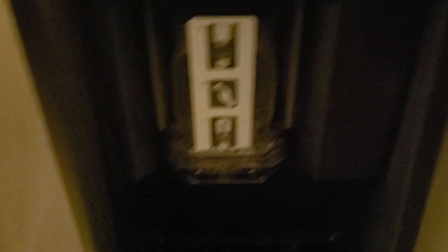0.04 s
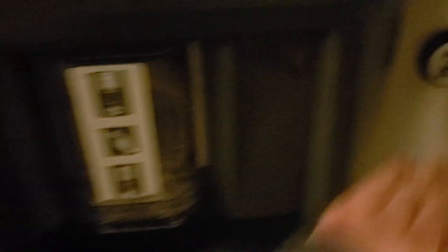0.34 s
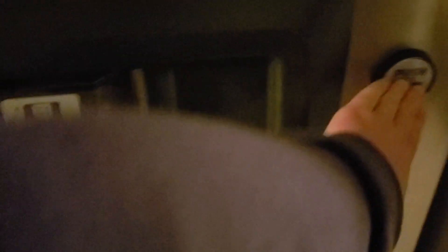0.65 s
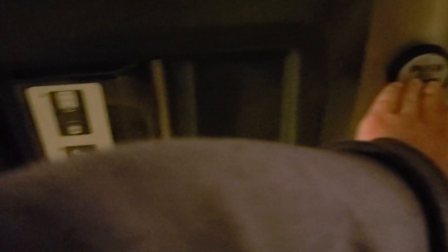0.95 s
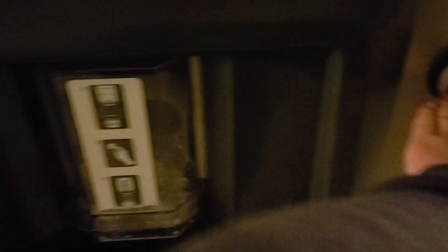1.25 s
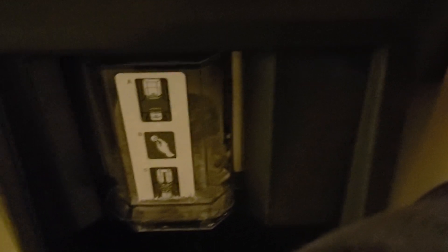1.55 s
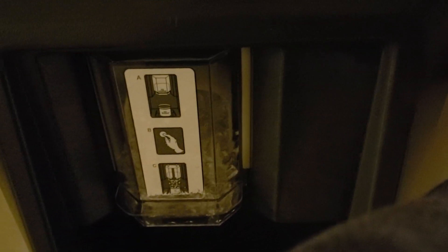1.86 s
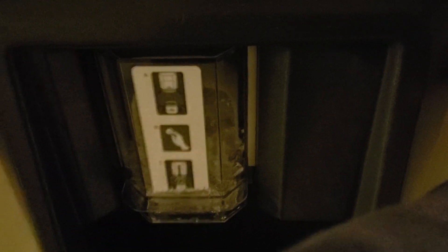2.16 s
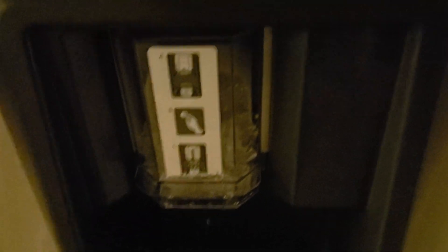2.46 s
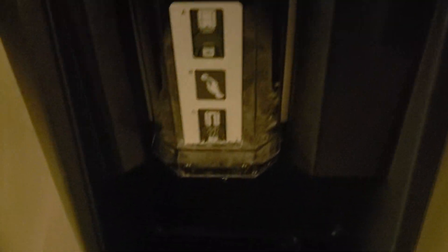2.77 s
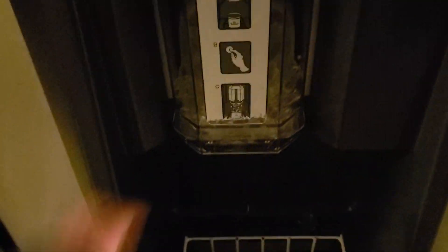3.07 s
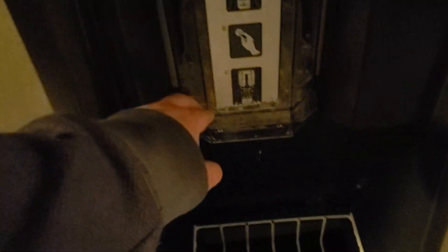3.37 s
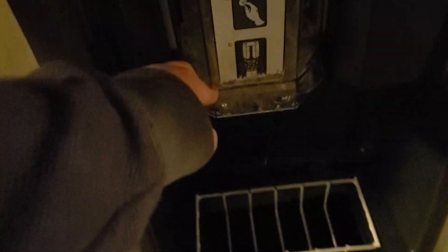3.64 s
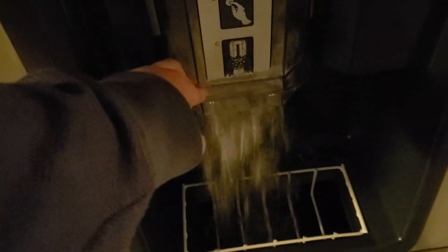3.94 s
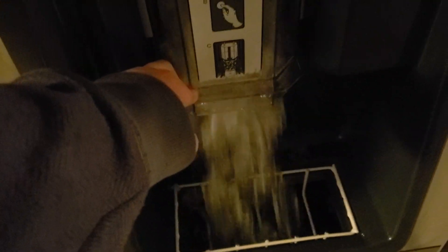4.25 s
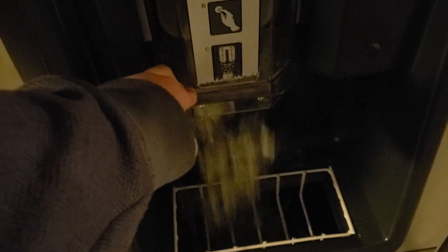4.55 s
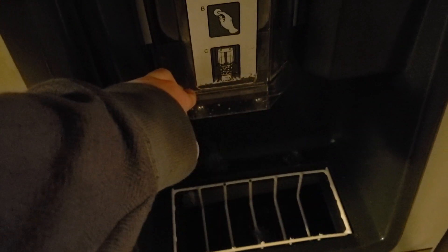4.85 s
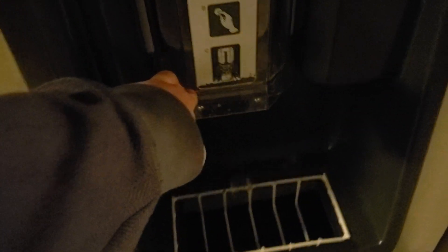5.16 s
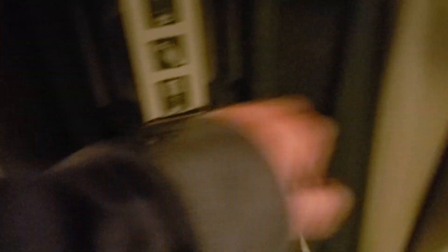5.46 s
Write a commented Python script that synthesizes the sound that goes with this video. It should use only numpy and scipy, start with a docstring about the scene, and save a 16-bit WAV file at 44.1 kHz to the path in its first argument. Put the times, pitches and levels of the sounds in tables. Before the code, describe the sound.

Close to an ice machine, a compressor hums and a fan blows. A button clicks and a geared motor rumbles, sending muffled ice rattling into a closed plastic chute. After a pause the chute clicks open and ice rushes out loudly, clattering on a wire grate and drumming on a plastic tray. The last pieces drop, the chute clacks shut, and the hum carries on more quietly.

```python
"""At the dispenser alcove of an ice machine, a compressor hums and a fan blows as the microphone comes
close. A button clicks and a geared auger rumbles ice into the closed chute. The chute is pushed open:
ice rushes out, clatters on a wire grate and drums on the plastic drain tray, the last pieces drop,
and the chute clacks shut. The alcove gives the contacts a short tail. The loud pour ducks the
microphone's gain, and the hum stays low afterwards."""
import sys
import numpy as np
from scipy import signal
from scipy.fft import rfft, irfft, next_fast_len
from scipy.io import wavfile
from scipy.ndimage import uniform_filter1d, map_coordinates

SR = 44100
rng = np.random.default_rng(int(sys.argv[2]) if len(sys.argv) > 2 else 0)


def dump(signal):
    """Clip the signal to [-1, 1] and save it as 16-bit WAV at the path in sys.argv[1]."""
    limited = np.clip(np.atleast_2d(signal).T, -1, 1)
    pcm = np.round(limited * 32767).astype(np.int16)
    wavfile.write(sys.argv[1], SR, pcm)


N = 251811
TIME = np.arange(N) / SR
RING = np.arange(SR // 4) / SR  # time axis of one hit, in seconds

# The biggest lumps landing. Each row: start in seconds, level in dB, own pitch in Hz,
# bright edge in dB relative to that level.
LUMP_HITS = [(3.737, -12, 1920, -8), (3.7915, -7.5, 1590, 12.5), (3.8248, -11.5, 1470, 10),
             (3.9388, -0.5, 1490, -4), (3.9821, -7, 1580, 10), (4.025, -1, 2790, 12),
             (4.0964, 0, 1520, 13.5), (4.2559, -2.5, 1550, 2), (4.3095, -1, 2790, 8), (4.3544, -2, 1920, 3),
             (4.3663, 2.5, 2920, 5), (4.481, -.5, 1640, 10), (4.5943, -1.5, 2900, 9), (4.6154, 1, 2740, 9),
             (4.624, -1, 1605, -6), (4.8474, 0, 1820, 2), (4.8582, -4, 1520, 12), (4.9155, -0.5, 2790, 4.5),
             (4.924, 1, 2790, -2), (5.0569, -16.5, 1660, 8)]
# The ring of the wire grate and its frame. Each row: pitch in Hz, width in Hz, gain in dB.
GRATE_MODES = [(1247, 68, -7.5), (1350, 30, 2.5), (1520, 48, 0.5), (1657, 45, 4), (1963, 15, -9),
               (2228, 32, -1), (2660, 23, -9.5), (2790, 20, 6), (2930, 20, 0), (3530, 174, -17),
               (4410, 200, -12)]
# The drum of the drain tray. Each row: pitch in Hz, width in Hz, gain in dB.
TRAY_MODES = [(85.5, 29, -8), (175, 34.5, -2.5), (432, 46, -0.5), (496, 53, -2), (593, 107, -3),
              (764, 110, -7)]
# The colour of ice striking plastic. Each row: frequency in Hz, relative level in dB.
ICE_EQ = [(100, -43), (400, -10.5), (950, -4.5), (1550, -1.5), (1950, -1.5), (2800, -4), (3900, -3),
          (4500, -6.5), (6000, -12), (9000, -23), (16000, -25)]
# The sparkle of small chips. Each row: frequency in Hz, relative level in dB.
CHIP_EQ = [(1000, -64), (4000, 2.5), (7000, -0.5), (10000, -2), (12500, 2.5), (16000, -10)]
# Ice muffled by the chute's walls. Each row: frequency in Hz, relative level in dB.
CLOSED_CHUTE_EQ = [(40, -31), (150, 9), (400, -12), (800, -9), (1100, 0), (1900, 0), (3200, -4),
                   (6000, -9.5), (9000, -15), (16000, -15)]
# Single nuggets on the chute's wall. Each row: start in seconds, level in dB, relative edge in dB.
NUGGET_HITS = [(1.0906, -23.5, 13.5), (1.1116, -20.5, 15.5), (1.217, -16.5, 6.5), (1.2705, -34.5, 26),
               (1.8513, -26.5, 1), (2.0997, -28.5, 11), (2.1673, -39.5, 17.5), (2.2568, -32, 12.5),
               (3.054, -46, 25.5), (5.1367, -24.5, 24)]
# The button, then the chute opening and shutting. Each row: start in seconds, level in dB,
# relative edge in dB.
CLICK_HITS = [(0.6805, -23, 3.5), (3.605, -23.5, 5.5), (5.3088, -8.5, 3.5), (5.3155, -10.5, 1),
              (5.4622, -22, -3), (5.4807, -16, -1)]
# The button's ring. Each row: pitch in Hz, level in dB relative to its click, t60 in seconds.
BUTTON_MODES = [(1140, -4, 0.043), (2690, -11, 0.028), (3130, -1.5, 0.033), (3660, -8, .03)]
# The snap of plastic. Each row: frequency in Hz, relative level in dB.
SNAP_EQ = [(300, -53), (1500, -7), (3200, -5), (6000, -6.5), (10000, -13.5), (16000, -19)]
# The ring in that snap. Each row: pitch in Hz, width in Hz, gain in dB.
SNAP_MODES = [(1070, 400, 10), (3100, 590, 24.7)]
# The hollow knock under it. Each row: frequency in Hz, relative level in dB.
KNOCK_EQ = [(60, -36), (330, 6), (900, 1), (1700, 1.5), (2500, -1.5), (5000, -10), (16000, -63)]
# The chute rubbing on its guide. Each row: frequency in Hz, relative level in dB.
SCUFF_EQ = [(200, -24), (900, -2), (1400, 0), (2300, -3), (3000, -12), (5000, -15), (16000, -40)]
# The rumble of the auger's gears. Each row: frequency in Hz, relative level in dB.
GEAR_EQ = [(25, -31), (55, -20), (85, 0.5), (110, -6), (170, -2), (330, -7), (700, -11.5), (830, -10.5),
           (1000, -19), (2000, -22), (6000, -39.5), (16000, -58)]
# The auger motor's whine. Each row: pitch in Hz, level in dB relative to the rumble.
WHINE_TONES = [(240, -6), (802, -12.5)]
# Dull thumps of the cabinet. Each row: start in seconds, relative level in dB.
CABINET_HITS = [(.88, -23), (3.594, -20.5), (4.02, -14.5), (4.916, -15), (5.321, -21.5), (5.363, -17)]
# The machine's weaker tones. Each row: pitch in Hz, level in dB relative to the main hum.
HUM_TONES = [(58.3, -21.5), (232, -12.5), (275, -15), (411, -17.5)]
# The fan's air. Each row: frequency in Hz, relative level in dB.
FAN_EQ = [(25, -45), (60, -20.5), (110, -0.5), (180, -5), (250, -1), (340, -4), (430, -3.5), (620, -8),
          (1000, -16), (2100, -21), (3300, -28.5), (6000, -38.5), (10000, -51.5), (16000, -53)]
# Stereo width. Each row: frequency in Hz, likeness of left and right from 0 to 1.
STEREO_LIKENESS = [(150, .99), (380, .95), (700, .72), (1300, .58), (2400, .25), (4400, 0)]
# The lean of a sound facing the right microphone port. Each row: frequency in Hz, left minus right in dB.
PAN_CURVE = [(60, 5), (95, -0.5), (150, 1), (240, 2), (380, 0), (600, 3), (950, -1), (1500, -2.5),
             (2380, -8), (3770, 2.5), (5980, -1), (9470, -6.5), (15000, -12)]

OPEN_S, OPENING_S, EMPTY_S = 3.594, 0.29, 4.736  # the chute is pushed, takes time to open, runs empty
FLOW_POWER, FLOW_SAG_DB_PER_S = 1.62, 4.5  # flow grows as a power of the opening, sags as it drains
SURGE_S, SURGE_DB = 3.925, 8  # the bulk of the load gives way
LUMP_RING_DB, LUMP_KNOCK_DB = -4, 27.5  # a lump's own ring and its send to the tray, relative to its level
LOAD_START_S, LOAD_END_S, LOAD_DB = 1.085, 1.48, -35.5
AUGER_ON_S, AUGER_OFF_S, AUGER_DB = 0.853, 2.36, -31.5
HUM_HZ, HUM_DB, FAN_DB = 136.7, -24.5, -30
APPROACH_DB, APPROACH_S = 4, 0.52  # hum and fan fade up as the microphone comes close


def ice_pour():
    """Ice clatters out, rings the grate and drums on the tray; fine chips crackle on a little longer."""
    surge = np.clip((TIME - SURGE_S) / 0.025, 0, 1)
    jump = amp(SURGE_DB * (surge - 1))
    flow = lambda fall: jump * swell(OPEN_S, OPENING_S, EMPTY_S, FLOW_SAG_DB_PER_S, fall, FLOW_POWER)
    clatter = amp(-12) * flow(fall=59.5)  # dB a second once the chute is empty
    crackle = amp(-16.8 + 1.8 * wobble(22)) * flow(fall=47.5)  # chips come in small clumps
    starts, db, pitches, edge_db = np.transpose(LUMP_HITS)
    landings = lambda: [contact(t60=.022, alcove_db=-9, alcove_t60=.1, attack=.0008) for _ in starts]
    clack = lambda: contact(t60=.007, alcove_db=-11, alcove_t60=.1)
    pieces = shower(impacts(clatter, rate=500, spread_db=2.5), clack)
    lumps = blows(starts, db, landings())
    body = coloured(amp(2) * pieces + amp(12.5) * lumps, ICE_EQ)
    grate = resonant(amp(16) * pieces + amp(24.5) * lumps, GRATE_MODES)
    knocks = blows(starts, db + LUMP_KNOCK_DB, landings())
    # small pieces are only heavy enough to drum on the tray once the bulk comes down
    tray = resonant(amp(18.5) * surge * pieces + knocks, TRAY_MODES)
    chips = impacts(crackle, rate=2000, spread_db=-0.5)
    crunch = shower(chips, lambda: contact(t60=0.0011, alcove_db=-2, alcove_t60=0.13), spots=5)
    chinks = tinkle(chips, low_hz=4000, high_hz=16000, t60=.016)
    edges = blows(starts, db + edge_db, landings())
    sparkle = coloured(amp(-0.9) * crunch + amp(-0.5) * chinks + edges, CHIP_EQ)
    tocks = blows(starts, db + LUMP_RING_DB, [mode(hz, t60=.03, attack=.002) for hz in pitches])
    return stereo(body + grate + tray + sparkle) + tocks


def chute_filling():
    """A load rattles into the empty chute; a trickle lands ever more softly on the growing pile."""
    load = amp(LOAD_DB) * swell(LOAD_START_S, .008, LOAD_END_S, sag_db_per_s=0.5, fall_db_per_s=48)
    spurts = amp(-48 + 0.95 * wobble(22))
    trickle = spurts * swell(AUGER_ON_S, 0.15, AUGER_OFF_S, sag_db_per_s=6, fall_db_per_s=17)
    pieces = impacts(np.hypot(load, trickle), rate=1100, spread_db=4)
    clacks = shower(pieces, lambda: contact(t60=0.0036, alcove_db=-14, alcove_t60=0.09), spots=5)
    chinks = tinkle(pieces, low_hz=3280, high_hz=16000, t60=.017)
    return stereo(coloured(amp(7) * clacks + amp(5) * chinks, CLOSED_CHUTE_EQ))


def plastic_clicks():
    """Button and chute click, the button rings, and nuggets tick on the wall with a brighter edge."""
    pressed_s, pressed_db, _ = CLICK_HITS[0]
    ring = sum(amp(db) * mode(hz, t60, attack=.001) for hz, db, t60 in BUTTON_MODES)
    button = blows([pressed_s], [pressed_db], [ring])
    return taps(CLICK_HITS, knock_db=16.5) + button + taps(NUGGET_HITS, knock_db=17)


def chute_scuff():
    """The hollow chute rubs along its guide just before it shuts."""
    rubbing = amp(-27.5) * swell(start=5.243, attack=0.02, end=5.32, sag_db_per_s=-3, fall_db_per_s=245)
    catches = amp(2 * wobble(220))
    return rubbing * catches * stereo(noise(SCUFF_EQ))


def auger():
    """The geared motor rumbles and whines while it pushes ice forward."""
    running = amp(AUGER_DB) * swell(AUGER_ON_S, 0.014, AUGER_OFF_S, sag_db_per_s=-1.9, fall_db_per_s=250)
    whine = sum(amp(db + 4.5 * wobble(12.07)) * np.sin(2 * np.pi * hz * TIME + 1.84 * wobble(16))
                for hz, db in WHINE_TONES)
    rumble = amp(1.8 * wobble(10)) * stereo(noise(GEAR_EQ))
    return running * (rumble + whine)


def cabinet_boom():
    """Shoves on the chute and the weight of the ice set a large panel booming."""
    starts, db = np.transpose(CABINET_HITS)
    return blows(starts, db - 1.5, [mode(hz=90.5, t60=0.17, attack=0.0051)] * len(starts))


def compressor_and_fan():
    """The bed: the compressor's slightly wavering hum and the fan's rush."""
    approach = amp(-APPROACH_DB * np.maximum(1 - TIME / APPROACH_S, 0))
    tone = lambda hz, drift: np.sqrt(2) * np.sin(2 * np.pi * hz * TIME + drift * wobble(9))
    hum = tone(HUM_HZ, drift=0.074) * amp(-0.13 + 1.18 * wobble(14))
    side_tones = sum(amp(db + 1.4 * wobble(9.2)) * tone(hz, drift=hz / 300) for hz, db in HUM_TONES)
    return approach * (amp(HUM_DB) * (hum + side_tones) + amp(FAN_DB) * stereo(noise(FAN_EQ)))


def taps(rows, knock_db):
    """Hits on plastic in three layers: a ringing snap, a hollow knock and a bright edge."""
    starts, db, edge_db = np.transpose(rows)
    snaps = lambda: [contact(t60=.016, alcove_db=-12, alcove_t60=.09, attack=.0006) for _ in starts]
    knocks = [contact(t60=.04, alcove_db=-10, alcove_t60=.11, attack=.002) for _ in starts]
    strikes = blows(starts, db, snaps())
    body = amp(11.5) * coloured(strikes, SNAP_EQ) + resonant(strikes, SNAP_MODES)
    knock = coloured(blows(starts, db + knock_db, knocks), KNOCK_EQ)
    edge = coloured(blows(starts, db + edge_db, snaps()), CHIP_EQ)
    return stereo(body + knock + edge)


def contact(t60, alcove_db, alcove_t60, attack=0.0022):
    """One hit of unit energy: a crack of noise and the alcove's short tail."""
    decay = amp(-60 * RING / t60) + amp(alcove_db - 60 * RING / alcove_t60)
    envelope = decay * (1 - np.exp(-RING / attack))
    return unit(rng.standard_normal((2, len(RING))) * envelope) / np.sqrt(len(RING))


def impacts(level, rate, spread_db, thinning=.22):
    """Random impacts, up to rate a second; a stronger flow brings more and harder ones."""
    density = rate * (level / level.max()) ** thinning
    struck = rng.random(N) < density / SR
    size = struck * amp(spread_db * np.minimum(rng.standard_normal(N), 1))
    # over a twentieth of a second the energy follows the flow
    power = np.abs(uniform_filter1d(size ** 2, SR // 20)) + 0.46 * density / SR + 1e-9
    return size * level / np.sqrt(power)


def shower(train, response, spots=8):
    """The impacts scatter over several spots, each with its own variation of the hit."""
    spot = rng.integers(spots, size=N)
    return sum(signal.oaconvolve((train * (spot == k))[None], response(), axes=1)[:, :N]
               for k in range(spots))


def tinkle(train, low_hz, high_hz, t60):
    """Each impact rings one small chip at a pitch of its own."""
    hits = np.flatnonzero(train)
    age = RING[:SR // 60]
    hz = rng.uniform(low_hz, high_hz, N)[hits, None]
    ring = np.sin(2 * np.pi * hz * age) * amp(-60 * age / t60)
    ring *= train[hits, None] / np.linalg.norm(ring, axis=1, keepdims=True)
    samples = (hits[:, None] + np.arange(len(age))).ravel()
    channel_gains = rng.uniform(-1, 1, (2, N))
    return np.array([np.bincount(samples, (ring * gain[hits, None]).ravel(), N)[:N]
                     for gain in channel_gains])


def blows(starts, db, responses):
    """Single hits laid on the timeline, each with its own sound."""
    track = np.zeros((2, N + len(RING)))
    for start, gain, response in zip(starts, amp(db), responses):
        track[:, round(start * SR):][:, :len(RING)] += gain * response
    return track[:, :N]


def mode(hz, t60, attack):
    """One decaying vibration."""
    return np.sin(2 * np.pi * hz * RING) * (1 - np.exp(-RING / attack)) * amp(-60 * RING / t60)


def resonant(x, modes):
    """x rings a body's resonances, which alternate in polarity."""
    body = lambda f: sum((-1) ** k * amp(db) * 1j * f * width / (hz * hz - f * f + 1j * f * width)
                         for k, (hz, width, db) in enumerate(modes))
    return filtered(x, body)


def swell(start, attack, end, sag_db_per_s, fall_db_per_s, power=1):
    """An envelope that rises, sags while held (a negative sag grows) and dies away after the end."""
    rise = np.clip((TIME - start) / attack, 0, 1) ** power
    held = np.clip(TIME, start + attack, end) - (start + attack)
    return rise * amp(-sag_db_per_s * held - fall_db_per_s * np.maximum(TIME - end, 0))


def wobble(rate):
    """A smooth random curve, rate knots a second."""
    return map_coordinates(rng.standard_normal(int(N * rate / SR) + 4), [TIME * rate])


def noise(eq):
    """Coloured noise of rms 1 in two channels."""
    return coloured(rng.standard_normal((2, N)), eq)


def coloured(x, eq):
    """x through a causal filter of unit energy shaped like this EQ curve."""
    size = 4096
    cepstrum = irfft(np.log(amp(along(eq, np.fft.rfftfreq(size, 1 / SR)))))
    # minimum phase keeps the attacks free of pre-ring
    cepstrum[1:size // 2] *= 2
    cepstrum[size // 2 + 1:] = 0
    pulse = irfft(np.exp(rfft(cepstrum)))
    return signal.fftconvolve(x, pulse[None] / np.linalg.norm(pulse), axes=1)[:, :N]


def filtered(x, response):
    """x through a frequency response."""
    size = x.shape[-1]
    padded = next_fast_len(size + 8192)
    return irfft(rfft(x, padded) * response(np.fft.rfftfreq(padded, 1 / SR)), padded)[..., :size]


def along(points, hz):
    """A curve read on a log frequency axis."""
    knots_hz, values = np.transpose(points)
    return np.interp(np.log(hz + 1), np.log(knots_hz + 1), values)


def amp(db):
    """Decibels to gain."""
    return 10 ** (np.asarray(db) / 20)


def unit(x):
    """x at rms 1."""
    return x / np.sqrt(np.mean(x ** 2) + 1e-20)


def stereo(pair):
    """Two unrelated signals become left and right: centred in the bass, wide in the treble."""
    angle = lambda hz: np.arccos(np.clip(along(STEREO_LIKENESS, hz), 0, 1)) / 2
    mid, side = filtered(pair, lambda hz: np.array([np.cos(angle(hz)), np.sin(angle(hz))]))
    return np.array([mid + side, mid - side])


def panned(x, facing):
    """The more a source faces the right microphone port, the more its treble leans that way."""
    return filtered(x, lambda hz: amp(facing * along(PAN_CURVE, hz) * np.array([[.5], [-.5]])))


def gain_control(x, threshold_db=-18, range_db=8, attack_s=0.032, sink_db_per_s=0.2):
    """Loud sound ducks the gain quickly; it stays down and keeps sinking very slowly."""
    smooth = lambda v: signal.lfilter([1 / (attack_s * SR)], [1, 1 / (attack_s * SR) - 1], v)
    level_db = 10 * np.log10(smooth(np.mean(x ** 2, axis=0)) + 1e-12)
    excess_db = np.clip(level_db - threshold_db, 0, range_db)
    duck_db = np.maximum.accumulate(excess_db - sink_db_per_s * TIME) + sink_db_per_s * TIME
    return x * amp(-smooth(duck_db))


def scene():
    """The mix: the machine's insides, the plastic clicks and scuff, and the pour out front."""
    inside = compressor_and_fan() + auger() + chute_filling() + cabinet_boom()
    plastic = plastic_clicks() + chute_scuff()
    return panned(inside, facing=0.55) + panned(plastic, facing=0.89) + panned(ice_pour(), facing=0.99)


def record(dry, port_hz=12600, width_hz=1900, port_db=7, top_hz=16100):
    """The microphone ports ring in the high treble, the gain ducks, peaks round off, the top is cut."""
    resonance = lambda f: 1j * f * width_hz / (port_hz ** 2 - f * f + 1j * f * width_hz)
    bright = filtered(dry, lambda f: 1 + (amp(port_db) - 1) * resonance(f))
    ducked = gain_control(bright)
    rounded = ducked / (1 + (ducked / .85) ** 4) ** .25
    return filtered(rounded, lambda hz: hz < top_hz)


dry = scene()
out = record(dry)
dump(out)
```